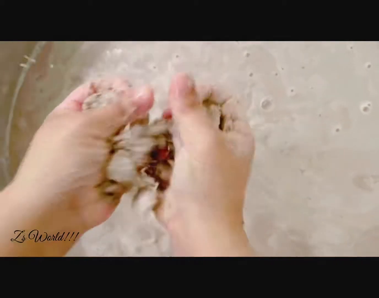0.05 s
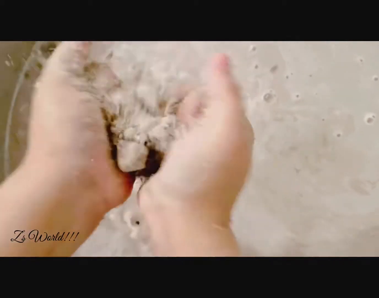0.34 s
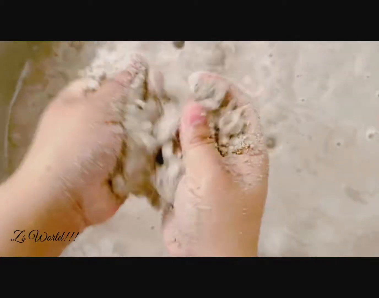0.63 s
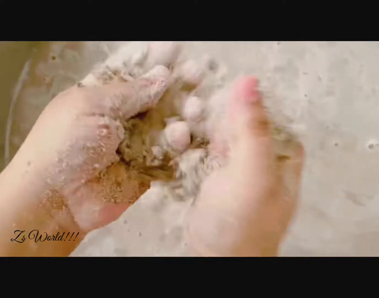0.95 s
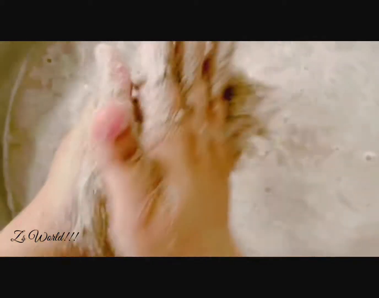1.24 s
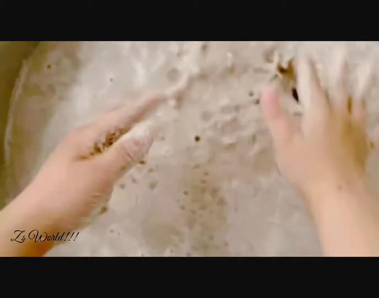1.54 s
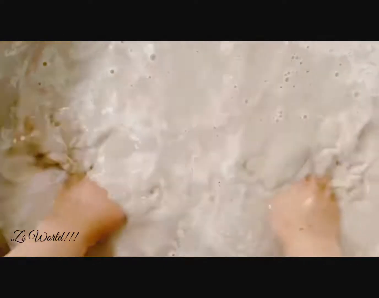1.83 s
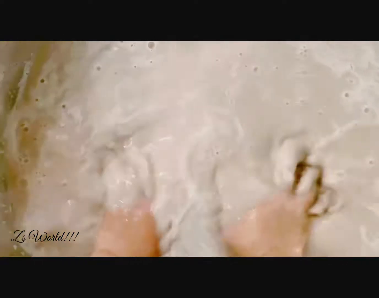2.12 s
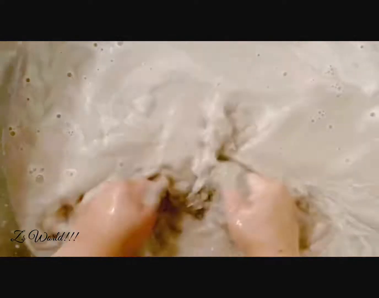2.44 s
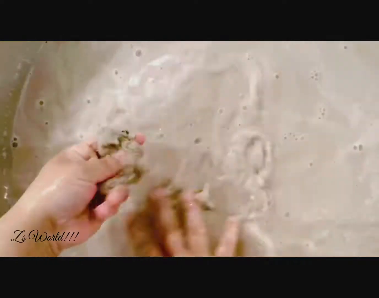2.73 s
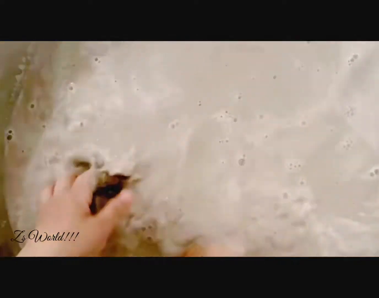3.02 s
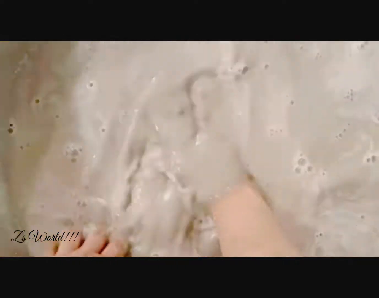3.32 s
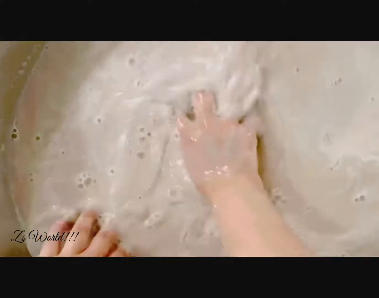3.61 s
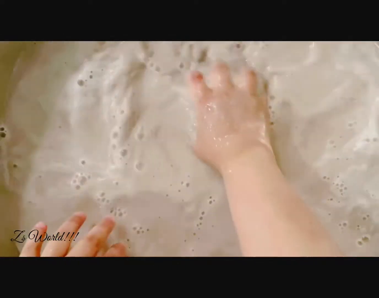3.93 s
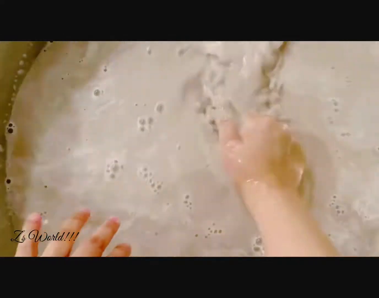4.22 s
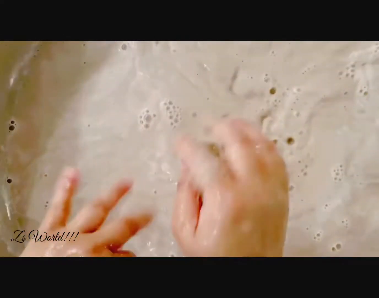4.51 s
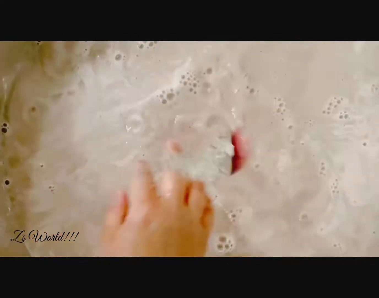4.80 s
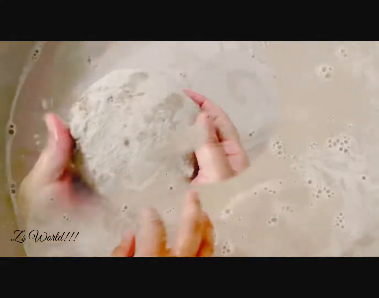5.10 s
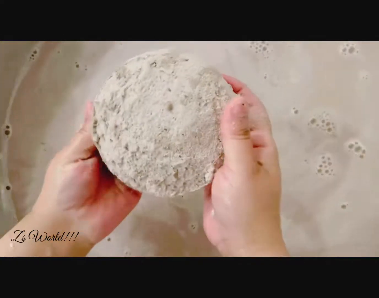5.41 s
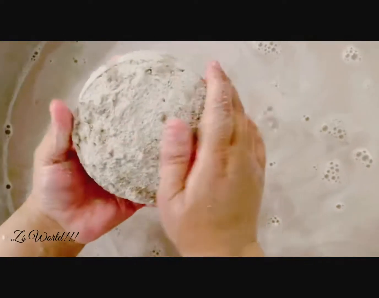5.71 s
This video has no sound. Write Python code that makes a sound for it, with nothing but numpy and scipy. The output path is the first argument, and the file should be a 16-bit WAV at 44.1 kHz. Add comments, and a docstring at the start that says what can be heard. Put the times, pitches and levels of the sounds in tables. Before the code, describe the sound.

Crisp, wet crunching of sand squeezed by hand gives way to soft sloshing and bubble plops, then a dry, grainy rasp.

```python
"""Wet sand and slurry in a basin.

Two hands crumble a lump of wet sand and cement, grope through the slurry, then rub a new ball.
With each stroke grains crackle, wet films snap, trapped air rings as bubbles and water sloshes.
A small room with a low hum answers; a close pair of microphone ports listens."""
import sys
import numpy as np
from scipy import signal
from scipy.fft import rfft, irfft, next_fast_len
from scipy.io import wavfile
from scipy.ndimage import uniform_filter1d

SR = 44100
rng = np.random.default_rng(int(sys.argv[2]) if len(sys.argv) > 2 else 0)


def unload_wav(signal):
    """Save mono or channel-first audio to the path in sys.argv[1] as 16-bit WAV at rate SR, clipped to [-1, 1]."""
    wavfile.write(
        sys.argv[1],
        SR,
        np.round(np.clip(np.atleast_2d(signal).T, -1, 1) * 32767).astype(np.int16),
    )


N = 253575
TIME_S = np.arange(N) / SR
EDGE_HZ, CRUMB_SPREAD_DB = 11600, 2

# Hand strokes in lump and slurry: start_s, length_s, sand_db, paste_db
STROKES = [(-0.03, 0.22, -43.5, -48.5), (0.269, 0.059, -40, -40), (0.418, 0.15, -45, -52),
           (0.611, 0.061, -40.5, -44.5), (0.685, 0.22, -42, -46), (0.967, 0.2, -38.5, -48.5),
           (1.206, 0.14, -40, -49), (1.374, 0.074, -38, -38), (1.508, 0.041, -40, -57),
           (1.608, 0.058, -41, -48.5), (2.224, 0.054, -57, -49), (2.373, 0.068, -46, -57),
           (2.507, 0.13, -44, -59.5), (2.752, 0.044, -39, -65), (2.945, 0.028, -39, -39),
           (3.185, 0.029, -60, -47.5), (3.574, 0.31, -55, -53.5), (3.977, 0.28, -72, -54),
           (4.23, 0.095, -52, -69), (4.44, 0.066, -56.5, -68)]
# Loudest breaking films and crumbs: time_s, level_db, centre_hz, decay_s
SNAPS = [(.0645, -10.5, 6100, 0.00034), (.0834, -34, 6200, .001), (.138, -16.5, 6600, 0.0016),
         (.1675, -14.5, 5800, 0.0058), (.2305, -10.5, 7200, 0.0012), (.326, -25, 5300, 0.0016),
         (.4, -19, 5570, 0.0017), (.4158, -23, 7000, 0.00089), (.443, -25.5, 5960, 0.0013),
         (.495, -15.5, 7350, 0.0027), (.515, -31, 5800, .0006), (.541, -25, 5200, 0.0011),
         (.569, -30, 6500, .0006), (.5857, -19, 7500, 0.00045), (.594, -34, 6500, 0.00066),
         (.608, -22, 6960, 0.00086), (.624, -8, 8500, 0.0013), (.6543, -35, 7200, .0007),
         (.6585, -13.5, 5970, 0.0044), (.7265, -36, 6500, .001), (.7555, -20, 4260, .0006),
         (.76, -23, 5440, 0.00097), (.8437, -26, 3200, 0.00048), (.8546, -17, 5400, 0.0033),
         (.8965, -25, 5470, 0.0011), (.9255, -34, 6030, .0008), (.9397, -12, 7400, 0.0024),
         (.9925, -27, 5900, .0007), (1.0155, -12.5, 7040, 0.0028), (1.048, -24, 6000, .0008),
         (1.1006, -18, 5800, 0.00044), (1.1215, -35, 6000, .0006), (1.1337, -11.5, 5300, 0.003),
         (1.1737, -26, 3800, .0007), (1.2617, -26, 3400, 0.0006), (1.2935, -31, 6000, .0008),
         (1.345, -32, 3600, .001), (1.374, -26, 4960, .0008), (1.3877, -21, 4470, 0.00042),
         (1.4052, -18, 3400, 0.0017), (1.412, -24, 3200, 0.0023), (1.4208, -14, 2880, .001),
         (1.4302, -12, 4140, 0.0048), (1.4397, -16, 5000, .00075), (1.4745, -6.5, 7260, 0.0013),
         (1.4825, -24, 5300, .0015), (1.5243, -11, 6150, .0012), (1.545, -28, 7500, .001),
         (1.5645, -31, 5500, .0007), (1.6296, -17, 6700, 0.00047), (1.6355, -25.5, 7100, 0.0018),
         (1.678, -26.5, 6000, .0007), (1.6905, -23, 3800, .001), (1.6958, -13.5, 6600, 0.0031),
         (1.909, -34, 9000, 0.0026), (2.2424, -19, 5700, 0.0014), (2.2578, -28, 6000, .0005),
         (2.304, -25.5, 4550, .001), (2.352, -26, 7700, 0.0016), (2.401, -31, 7020, .001),
         (2.4118, -30, 6360, 0.0008), (2.4575, -22.5, 7400, .0006), (2.494, -25, 4400, .0009),
         (2.5457, -31, 6030, .001), (2.561, -27, 7620, 0.00083), (2.5722, -15.5, 5100, 0.0026),
         (2.577, -4, 3100, 0.0021), (2.594, -16.5, 4600, 0.0025), (2.6342, -19, 7750, 0.00083),
         (2.6484, -10, 6900, .0005), (2.652, -13.5, 6800, 0.00071), (2.751, -28.5, 6000, 0.00064),
         (2.791, -24.5, 5500, 0.00051), (2.8, -29, 7500, .001), (2.8225, -32, 6000, .0008),
         (2.891, -26, 6100, .0013), (2.9213, -9, 8100, 0.0023), (2.9335, -18, 2880, 0.00076),
         (2.9562, -13, 4220, 0.0015), (2.9755, -16.5, 7500, .001), (2.989, -18.5, 4100, 0.0022),
         (3.048, -22, 8160, .0011), (3.101, -26, 8000, 0.001), (3.225, -24, 5440, 0.00059),
         (3.605, -38, 2500, .003), (3.6107, -28, 4500, 0.001), (3.62, -31, 3640, 0.0034),
         (3.671, -24.5, 5000, 0.001), (3.68, -22, 4700, 0.0006), (3.7235, -25.5, 4840, .0011),
         (3.7588, -36, 6500, .00077), (3.7785, -12.5, 5650, 0.00066), (3.7815, -10, 5700, .0036),
         (3.7865, -6, 4800, 0.00029), (3.801, -29, 4800, .0015), (4.039, -37, 6060, 0.00037),
         (4.2888, -25, 4900, 0.00088), (4.4325, -25.5, 8000, .001), (4.4358, -11.5, 8200, 0.00018),
         (4.454, -21, 4560, 0.0014), (4.4695, -28, 6500, 0.00057), (4.5216, -13.5, 5600, 0.0019),
         (4.5266, -9, 5800, 0.00041), (4.6188, -35, 2840, 0.0032), (4.716, -33, 6800, .001),
         (5.584, -25, 6400, .002), (5.6644, -34, 6500, 0.00081)]
# Loudest air pockets: time_s, level_db, pitch_hz, t60_s, glide_per_s, film_relative_db
BUBBLES = [(0.109, -29.5, 1480, 0.041, 16, -12), (.139, -28.5, 960, .012, -5, -9),
           (.165, -34.5, 850, 0.069, 3, 16), (.204, -32, 2300, 0.016, -4, -10),
           (.266, -29.5, 2270, 0.028, 9, -8), (.288, -25.5, 3470, .03, -7, -16),
           (.290, -24, 2740, 0.04, 20, -20), (.325, -19.5, 3120, 0.051, -6, -4),
           (0.356, -26.5, 910, 0.012, 39, 9.5), (0.356, -30, 1650, 0.031, -7, -2),
           (.497, -25, 2400, 0.019, -15, -13), (.534, -25.5, 2350, 0.019, 21, 5.5),
           (.544, -27, 2270, 0.018, -8, 2), (.551, -28, 2200, 0.02, -20, -16),
           (.612, -27.5, 3260, 0.034, -14, -7), (0.679, -21.5, 2240, 0.011, 11, -11),
           (0.696, -30.5, 2060, 0.034, 2, -13), (.731, -30, 1930, 0.027, -15, -8),
           (.799, -28, 2530, 0.031, -10, -14), (.824, -24, 1590, 0.023, 2, -4),
           (.8547, -27.5, 730, 0.011, 1, 2.5), (0.884, -27.5, 1780, 0.025, 0, 2),
           (0.8959, -21, 1010, 0.016, 11, -4), (.924, -31, 1016, 0.027, -2, -16),
           (.9395, -27, 970, 0.0062, -3, -2), (1.013, -32, 1094, 0.045, -13.5, 9.5),
           (1.031, -24.5, 1860, 0.05, 22, -14), (1.04, -22.5, 2460, 0.014, 20, -3),
           (1.057, -32, 1660, 0.02, -1, -4), (1.081, -19, 1450, 0.0076, 17, -24),
           (1.1006, -17, 1072, 0.039, -7.5, -4), (1.121, -21.5, 1036, 0.029, -5, 2.5),
           (1.1425, -24.5, 1620, 0.024, 8, 0.5), (1.159, -27, 2400, .018, 2, -8),
           (1.196, -28, 1090, 0.025, -12, -18), (1.2345, -17, 2590, 0.021, -16.5, -10),
           (1.271, -28, 2380, .014, -4, -7), (1.277, -28, 1870, 0.023, 5, -7),
           (1.288, -28, 2300, 0.013, 6, -10), (1.361, -27, 2480, .028, -3, -6),
           (1.3673, -25.5, 1670, 0.011, -4, -4), (1.4045, -14, 2390, 0.01, 15, -22),
           (1.410, -19, 2310, .022, 10, -18), (1.411, -26.5, 1123, 0.042, -4, 1),
           (1.419, -25, 1420, 0.0093, -15, -1), (1.430, -25, 1960, 0.044, 6, -17),
           (1.445, -21.5, 2330, 0.025, -6.5, -8), (1.513, -27, 2770, 0.057, -10.5, -10),
           (1.526, -14.5, 1480, 0.0039, -5, -28), (1.551, -19.5, 5170, .018, -4, -14),
           (1.579, -26, 1075, 0.027, -20, -7.5), (1.5845, -23, 6130, .011, 2, -14),
           (1.626, -27.5, 1870, 0.05, 17, -14), (1.637, -22, 2070, 0.031, -12, -18),
           (1.656, -33, 2380, .012, 0, -6), (1.663, -21.5, 1900, 0.014, -2, -15),
           (1.678, -21.5, 1400, 0.01, 25, -16), (1.6891, -21.5, 1860, 0.018, -6, -6),
           (1.784, -23.5, 1430, 0.0077, -12, -21), (1.802, -34, 1340, 0.023, -16, 1),
           (1.862, -47.5, 613, 0.097, -5.5, -18), (2.1702, -30, 2680, 0.02, -2, -4),
           (2.2576, -21, 1330, 0.034, 13, -2.5), (2.311, -22.5, 1380, 0.031, 8, -11),
           (2.3115, -39, 3030, .025, 0, -9), (2.312, -25, 2260, 0.031, 1, -7),
           (2.339, -38, 653, 0.13, 2, -12), (2.413, -25, 1800, 0.029, 14, -16),
           (2.414, -24, 1360, 0.02, -8, -31), (2.4219, -29.5, 1040, 0.12, 10, -12),
           (2.427, -24, 1690, 0.021, -8, -15), (2.484, -19.5, 1430, 0.038, -4.5, -6),
           (2.507, -31, 2350, 0.064, 0, -1), (2.5764, -6.5, 2360, 0.011, -14, -17),
           (2.5785, -18, 3450, 0.016, 4, -25), (2.5785, -22.5, 700, 0.034, -1, 6),
           (2.6492, -15, 1510, 0.0096, -16, -15), (2.6509, -29, 733, 0.044, 2.5, 0),
           (2.665, -30, 2700, 0.025, -11, -5), (2.837, -30, 1410, 0.015, 13, -9),
           (2.903, -32, 2900, 0.027, 1, 0), (2.9556, -14.5, 2970, 0.02, 10, -15),
           (2.9565, -12.5, 2270, 0.009, 0, -18), (2.9565, -15, 5560, 0.016, -12, -12),
           (2.978, -20, 2650, 0.012, -7, -15), (2.981, -18, 1800, 0.01, 3, -11),
           (2.989, -26, 3200, .014, 0, 4), (3.0025, -37, 5450, 0.018, -2, -9),
           (3.011, -31.5, 1760, 0.022, -16, -15), (3.052, -20.5, 2480, 0.018, 9, -15),
           (3.055, -30, 1430, 0.044, 35, -13), (3.224, -26, 5600, 0.014, 0, -20),
           (3.266, -34, 1940, 0.032, -1, -21), (3.589, -39.5, 1110, 0.021, -14, 3),
           (3.6098, -22, 1187, 0.018, -18, -7.5), (3.6185, -31, 1480, .02, 10, -13),
           (3.656, -30.5, 1860, .018, 2, -14), (3.697, -26.5, 1800, 0.023, 33, -13),
           (3.742, -22, 1940, 0.015, -6, -20), (3.751, -23, 1420, 0.022, -15, -1),
           (3.758, -20, 6530, 0.011, 12, -20), (3.765, -26, 5500, 0.012, -10, -14),
           (3.785, -22, 710, 0.018, -42, 8.5), (3.972, -29.5, 2170, 0.014, -5, -6),
           (4.038, -22, 6530, 0.0099, 0, -11), (4.164, -29.5, 1600, 0.0047, -1, -12),
           (4.233, -37, 2120, 0.019, 10, 4), (4.262, -30.5, 2860, 0.019, 9, -13),
           (4.364, -32.5, 1530, 0.015, 3, -20), (4.365, -30, 1064, 0.024, -9, -15),
           (4.3752, -30, 1100, 0.029, 38, -14), (4.3811, -26, 2510, 0.016, -14, -13),
           (4.454, -28.5, 1030, 0.033, 13, -23), (4.5275, -27, 750, 0.0038, -30, -28),
           (4.6183, -34.5, 1720, 0.027, -4, 6), (4.7155, -39, 1755, 0.022, -3, -12)]
# Big cavities in the slurry: time_s, level_db, pitch_hz, t60_s, glide_per_s, swell_cycles
GULPS = [(.164, -26, 258, 0.012, -13, 0.73), (2.9215, -10, 887, .011, -9, 1.7),
         (2.9365, -25.5, 925, 0.036, -7.5, 1.3), (2.9575, -10.5, 587, 0.015, -5, 1.5),
         (2.963, -20, 530, 0.041, -0.5, 1.8), (3.839, -16, 498, 0.12, 13, 1.24),
         (3.8429, -19, 647, 0.043, 40.5, 1)]
# Air pushed under the slurry: start_s, length_s, level_db
GURGLES = [(1.915, .2, -48.5), (2.19, 0.12, -47), (3.04, 0.16, -52)]
# Palm rubs on the ball: start_s, length_s, level_db
RUBS = [(4.66, 0.33, -55.5), (4.96, 0.31, -50), (5.17, 0.27, -45.5), (5.5, .11, -38), (5.66, .12, -42)]
# Whistles of sliding hands: start_s, length_s, level_db, centre_hz, sigma_hz
WHISTLES = [(1.86, 0.26, -52.5, 3100, 190), (3.03, 0.29, -55.5, 3100, 200), (4.96, .13, -55.5, 2790, 89.3),
            (5.165, 0.05, -50.5, 2740, 110)]
# Water moved by sunken hands: time_s, level_db
WATER_LEVEL = [(0.0, -57), (0.35, -49.5), (0.54, -56), (1.2, -60), (1.42, -53.5), (1.86, -62.5),
               (2.16, -57), (2.47, -60.5), (2.8, -56.5), (3.09, -51.5), (3.41, -54), (4.02, -53),
               (4.15, -55.5), (4.8, -68.5), (5.17, -68.5), (5.75, -57)]
# Ripples round the arms: time_s, level_db
RIPPLE_LEVEL = [(0, -43), (1.7, -51.5), (1.9, -46.5), (2.15, -46), (2.35, -48), (2.85, -49), (3.15, -46.5),
                (3.35, -52.5), (4.1, -53), (4.7, -66), (5.75, -53)]
# Grinding sand: freq_hz, gain_db
GRIT_SPECTRUM = [(300, -17.5), (1200, -31), (2500, -7.5), (4000, -1.5), (5500, 0.5), (7500, 3), (9500, 0.5),
                 (10500, 3)]
# Wet paste: freq_hz, gain_db
PASTE_SPECTRUM = [(200, -30.5), (500, -6), (900, 7), (1300, -5.5), (2200, 0.5), (3100, 2), (4000, -9),
                  (6000, 2), (10000, -38)]
# Rubbed dry sand: freq_hz, gain_db
SCRAPE_SPECTRUM = [(200, -27), (600, -8.5), (1200, -17.5), (2000, -10), (4000, -4.5), (6000, 2.5),
                   (8000, 5.5), (9600, 1), (10500, -5.5)]
# Ripples: freq_hz, gain_db
RIPPLE_SPECTRUM = [(200, -19.5), (450, -10.5), (800, -5.5), (1200, -3.5), (1550, -3), (1900, -3.5),
                   (2300, 0), (2800, -1), (3450, -6), (4200, -3.5), (10000, -13.5)]
# Churning water: freq_hz, gain_db
SURGE_SPECTRUM = [(100, 4), (180, 4), (280, -0.5), (400, -4), (550, -2.5), (1500, -18)]
# Hollows of basin and cupped hands: centre_hz, width_hz, gain_db
BASIN_MODES = [(1340, 73, -12), (1710, 290, 15), (2220, 120, 14.5), (2790, 61, 7.5), (3400, 49, 3)]
# Hollow between palms and ball: centre_hz, width_hz, gain_db
PALM_MODES = [(1740, 200, 5.5), (2296, 79, 14.5), (2820, 80, 10.5), (3510, 89, 11), (4600, 310, 1.5),
              (6110, 83, 1), (6700, 78, -3.5)]
# Room hum: freq_hz, rms_db
HUM_LINES = [(58.5, -50.5), (121, -61), (181, -86.5), (241, -70)]
# Room rumble: freq_hz, gain_db
RUMBLE_SPECTRUM = [(15, -18), (30, -12), (45, -6.5), (58, 3.5), (80, -6), (110, -8), (150, -8.5),
                   (220, -22.5), (400, -52), (1000, -50)]
# Near walls: delay_s, gain_db
ECHOES = [(.0034, -40), (.0092, -35), (0.017, -23.5)]
# Room decay: freq_hz, t60_s
ROOM_T60 = [(200, .5), (420, .55), (570, .88), (780, .58), (1200, .5), (3000, .38), (6000, .27),
            (10000, .22)]
# Room tail strength: freq_hz, gain_db
ROOM_GAIN = [(150, -14.5), (550, -11), (800, -9), (1300, -14), (3000, -17), (6000, -18), (10000, -23.5)]
# Diffuse sound between the ports: freq_hz, coherence
PORT_COHERENCE = [(100, 1), (280, 0.21), (600, 0.098), (1000, 0.041), (1700, 0.99), (3200, 1), (6000, 0.39),
                  (10000, 0.15)]
# Phase between the ports: freq_hz, left_lead_rad
PORT_PHASE = [(20, 0), (1900, 0), (2700, .75), (3900, .7), (4400, 1.4), (4850, 3.1), (5200, 4.8),
              (5650, 6.15), (6300, 6.5), (6900, 7.4), (8700, 9.25), (9400, 9.3), (10200, 9.9)]
# Treble lift near 10 kHz, then a steep drop: freq_hz, gain_db
TOP_TREBLE = [(8500, -1), (10050, 4.5), (10700, -26), (11600, -30)]


def grit(per_s=2200, bands=14, width_ratio=.13, clump_db=4.5, clump_hz=90, chip_db=-10, level_db=1.5):
    """Sand slips in clumps under the fingers; each crumb ticks in a band set by its size."""
    grains = np.zeros(N)
    for centre_hz in np.geomspace(2600, 9200, bands):
        ticks = clicks(per_s / bands, CRUMB_SPREAD_DB)
        grains += filtered(ticks, lambda hz: bell(hz, centre_hz, width_ratio * centre_hz))
    grains += amp(chip_db) * clicks(per_s / bands, CRUMB_SPREAD_DB)  # broadband hard chips
    grains *= amp(clump_db * drift(clump_hz))
    grains = hollow(grains, BASIN_MODES, depth_db=-11)
    return steadied(coloured(grains, GRIT_SPECTRUM)) * grinding() * amp(level_db)


def paste(per_s=2200, clump_db=8, clump_hz=60, level_db=-4):
    """Stirred wet paste smacks and fizzes."""
    grains = clicks(per_s, CRUMB_SPREAD_DB) * amp(clump_db * drift(clump_hz))
    grains = hollow(grains, BASIN_MODES, depth_db=-6)
    return steadied(coloured(grains, PASTE_SPECTRUM)) * stirring() * amp(level_db)


def snaps(rise_s=.0003, fray_s=.00054, spray_s=.0035, spray_db=-16, ragged_db=5, level_db=-.5):
    """A film frays, tears in a short burst and leaves a ragged spray."""
    out = np.zeros(N)
    t = np.arange(-500, 900) / SR
    before, after = np.minimum(t, 0), np.maximum(t, 0)
    for time_s, db, centre_hz, decay_s in list(SNAPS) + pocket_films() + crumbs():
        noise, tatter = rng.standard_normal((2, len(t)))
        ragged = unit_rms(amp(ragged_db * unit_rms(uniform_filter1d(tatter, size=40))))
        tear = np.exp(before / rise_s - after / decay_s)
        spray = amp(spray_db) * ragged * np.exp(before / fray_s - after / spray_s)
        burst = filtered(np.sign(noise) * np.hypot(tear, spray), lambda hz: snap_band(hz, centre_hz))
        energy_ms = np.sum(burst ** 2) / (SR / 1000)
        add(out, time_s + t[0], amp(db + level_db) * burst / np.sqrt(energy_ms))
    return out


def snap_band(hz, centre_hz, width_ratio=.47, skirt_db=-20, low_hz=700, bright_db=7):
    """Snap response: so small a source radiates little bass, much treble."""
    bass_cut = hz ** 2 / (hz ** 2 + low_hz ** 2)
    treble = amp(np.interp(hz, [6000, 9500], [0, bright_db])) * (hz < EDGE_HZ)
    return bass_cut * treble * (bell(hz, centre_hz, width_ratio * centre_hz) + amp(skirt_db))


def pocket_films(offset_db=-2, decay_s=.0002):
    """SNAPS rows: a film tears as each pocket opens, an octave above its ring."""
    return [(time_s, db + film_db + offset_db, 2 * hz, decay_s)
            for time_s, db, hz, _, _, film_db in BUBBLES]


def crumbs(per_s=16, over_db=5, spread_db=4, centre_hz=5500, spread_octaves=.93, decay_s=.0005):
    """SNAPS rows: lesser crumbs break at random, as hard as the sand is ground."""
    force_db, rows = 20 * np.log10(grinding()), []
    for when, size, pitch in rng.random((int(per_s * N / SR), 3)):
        db = force_db[int(when * N)] + over_db + spread_db * min(-np.log(1 - size), 2)
        hz = centre_hz * 2 ** (spread_octaves * (2 * pitch - 1))
        rows.append((when * N / SR, db, hz, decay_s))
    return rows


def bubbles():
    """Single air pockets plip, each with its own decay and chirp."""
    out = np.zeros(N)
    for time_s, db, hz, t60_s, glide_per_s, _ in BUBBLES:
        plip = pocket(hz, t60_s, glide_per_s, swell_cycles=1, wobble=.061, rough=.27)
        add(out, time_s, amp(db) * plip)
    return out


def gulps(level_db=2):
    """Big cavities close with a deep, nearly clean gulp."""
    out = np.zeros(N)
    for time_s, db, hz, t60_s, glide_per_s, swell_cycles in GULPS:
        gulp = pocket(hz, t60_s, glide_per_s, swell_cycles, wobble=.022, rough=.2)
        add(out, time_s, amp(db + level_db) * gulp)
    return out


def pocket(hz, t60_s, glide_per_s, swell_cycles, wobble, rough, wobble_cycles=1.13):
    """Air pocket in thick slurry: unsteady pitch and strength."""
    noise = rng.standard_normal((2, 9000))
    slow = filtered(noise, lambda f: np.exp(-np.minimum(f * wobble_cycles / hz, 10) ** 2))
    bend, squeeze = unit_rms(slow)
    pip = ring(hz, t60_s, glide_per_s, wobble * bend, swell_cycles)
    pip *= 1 + rough * squeeze[:len(pip)]
    # little radiation below its own pitch
    return filtered(pip, lambda f: 1 - np.exp(-np.minimum(2 * f / hz, 10) ** 4))


def ring(hz, t60_s, glide_per_s, bend=np.zeros(9000), swell_cycles=.33):
    """Trapped air swells and rings down; its pitch slides as it nears the surface."""
    t = np.arange(0, np.clip(t60_s * 1.2, .005, .2), 1 / SR)
    pitch_hz = hz * np.maximum(1 + glide_per_s * t, .5) * (1 + bend[:len(t)])
    envelope = (1 - np.exp(-(t * hz / swell_cycles) ** 2)) * np.exp(-np.log(1000) * t / t60_s)
    return envelope / envelope.max() * np.sin(2 * np.pi * np.cumsum(pitch_hz) / SR)


def froth(level_db=-2):
    """Tiny bubbles burst in the stirred slurry."""
    stream = bubbling(per_s=220, low_hz=1137, high_hz=4190, t60_cycles=76, glide_per_s=23, spread_db=0)
    return stream * stirring() * amp(level_db)


def gurgle():
    """Large, slow pockets roll out from under the sunken hands."""
    stream = bubbling(per_s=160, low_hz=133, high_hz=412, t60_cycles=24, glide_per_s=1.8, spread_db=2)
    return stream * pressure(GURGLES)


def bubbling(per_s, low_hz, high_hz, t60_cycles, glide_per_s, spread_db):
    """Steady stream of mixed bubbles, rms 1."""
    out = np.zeros(N)
    for when, pitch, size, slide in rng.random((int(per_s * N / SR), 4)):
        hz = low_hz * (high_hz / low_hz) ** pitch
        db = spread_db * min(-np.log(1 - size), 3)
        add(out, when * N / SR, amp(db) * ring(hz, t60_cycles / hz, glide_per_s * (2 * slide - 1)))
    return unit_rms(out)


def scrape(catch_db=1.6, catch_hz=60, lurch_db=1.5, lurch_hz=14, level_db=1):
    """Dry sand rasps under unevenly sliding palms and rings the hollow between them."""
    grains = clicks(per_s=5000, spread_db=1.5)
    grains *= amp(catch_db * drift(catch_hz) + lurch_db * drift(lurch_hz))
    return coloured(hollow(grains, PALM_MODES), SCRAPE_SPECTRUM) * pressure(RUBS) * amp(level_db)


def whistles(flutter_db=2, flutter_hz=40):
    """Thin, fluttering whistles in the hiss of sliding hands."""
    out = np.zeros(N)
    for start_s, length_s, db, centre_hz, sigma_hz in WHISTLES:
        band = filtered(rng.standard_normal(N), lambda hz: bell(hz, centre_hz, sigma_hz))
        band *= amp(flutter_db * drift(flutter_hz))
        out += unit_rms(band) * pressure([(start_s, length_s, db)])
    return out


def ripples(lap_db=3, lap_hz=25):
    """Ripples lap at the arms and the basin wall."""
    laps = clicks(per_s=5000, spread_db=2.5) * amp(lap_db * drift(lap_hz))
    return coloured(laps, RIPPLE_SPECTRUM) * amp(curve(RIPPLE_LEVEL))


def surge(swell_db=4, swell_hz=25, level_db=1):
    """Water churns dully round the sunken hands."""
    churn = coloured(rng.standard_normal(N), SURGE_SPECTRUM)
    return churn * amp(curve(WATER_LEVEL) + level_db + swell_db * drift(swell_hz))


def room(x, build_s=.00057):
    """Diffuse tail, partly coherent between the ports."""
    hz, t, (left, other) = signal.stft(rng.standard_normal((2, SR)), SR, nperseg=256)
    coherence = np.clip(lookup(PORT_COHERENCE, hz), -1, 1)[:, None]
    right = coherence * left + np.sqrt(1 - coherence ** 2) * other
    t60_s = np.clip(lookup(ROOM_T60, hz), .1, 1)[:, None]
    fade = np.exp(-np.log(1000) * t / t60_s) * (1 - np.exp(-t / build_s))
    fade *= amp(lookup(ROOM_GAIN, hz))[:, None] / np.sqrt(SR * np.mean(fade ** 2, axis=1, keepdims=True))
    tail = signal.istft(np.array([left, right]) * fade, SR, nperseg=256)[1]
    return signal.fftconvolve(x[None], tail, axes=1)[:, :N]


def hum(rumble_db=-51.2, waver_rad=.6, waver_hz=3):
    """Wavering low lines over room rumble."""
    lines = sum(amp(db) * np.sqrt(2) * np.sin(2 * np.pi * hz * TIME_S + waver_rad * drift(waver_hz))
                for hz, db in HUM_LINES)
    return lines + amp(rumble_db) * coloured(rng.standard_normal(N), RUMBLE_SPECTRUM)


def grinding():
    """Stroke gain on the sand."""
    return pressure([(start_s, length_s, db) for start_s, length_s, db, _ in STROKES], rest_db=-65)


def stirring(current_db=-5):
    """Stroke gain on the paste; moving water sustains it between strokes."""
    moves = [(start_s, length_s, db) for start_s, length_s, _, db in STROKES]
    return pressure(moves, rest_db=curve(WATER_LEVEL) + current_db)


def pressure(moves, rest_db=-100, grip_s=.022, release_db_per_s=141):
    """Gain of movements that take hold, press evenly and let go."""
    power = amp(rest_db) ** 2
    for start_s, length_s, db in moves:
        since_s = TIME_S - start_s
        grip = np.clip(since_s / grip_s, 0, 1)
        release_db = release_db_per_s * np.maximum(since_s - length_s, 0)
        power = power + (grip * amp(db - release_db)) ** 2
    return np.sqrt(power)


def hollow(x, modes, depth_db=0):
    """A cavity stresses a few bands."""
    return x + sum(amp(db + depth_db) * signal.lfilter(*signal.iirpeak(hz, hz / width_hz, SR), x)
                   for hz, width_hz, db in modes)


def clicks(per_s, spread_db):
    """Random clicks of either sign; most small, a few large."""
    when, size, sign = rng.random((int(per_s * N / SR) + 1, 3)).T
    db = spread_db * np.minimum(-np.log(1 - size), 5)
    out = np.zeros(N)
    out[(when * N).astype(int)] = np.sign(sign - .5) * amp(db)
    return out


def steadied(x):
    """Holds the typical level at 1; big grains still stand out."""
    power = np.maximum(uniform_filter1d(x ** 2, size=220), 1e-9)
    return x / np.exp(uniform_filter1d(np.log(power), size=4400) / 2)


def drift(rate_hz, hop=32):
    """Slow noise, rms 1."""
    noise = rng.standard_normal(len(TIME_S[::hop]))
    slow = filtered(noise, lambda hz: np.exp(-(hz / hop / rate_hz) ** 2))
    return np.interp(TIME_S, TIME_S[::hop], unit_rms(slow))


def coloured(x, spectrum):
    """Applies a spectrum table; rms 1."""
    return unit_rms(filtered(x, lambda hz: amp(lookup(spectrum, hz))))


def filtered(x, response):
    """Applies a response given as a function of Hz."""
    size = next_fast_len(x.shape[-1] + 600, True)
    return irfft(rfft(x, size) * response(np.fft.rfftfreq(size, 1 / SR)), size)[..., :x.shape[-1]]


def bell(hz, centre_hz, sigma_hz):
    """Gaussian band."""
    return np.exp(-.5 * ((hz - centre_hz) / sigma_hz) ** 2)


def lookup(table, hz):
    """Interpolates on a log-frequency axis."""
    freq_hz, value = np.transpose(table)
    return np.interp(np.log(hz + 1), np.log(freq_hz + 1), value)


def curve(table):
    """Interpolates a time table at every sample."""
    return np.interp(TIME_S, *np.transpose(table))


def add(mix, time_s, sound):
    """Mixes a sound in place."""
    part = mix[max(round(time_s * SR), 0):][:len(sound)]
    part += sound[:len(part)]


def unit_rms(x):
    """Scales to rms 1."""
    return x / np.sqrt(np.mean(x ** 2) + 1e-20)


def amp(db):
    """Decibels to gain."""
    return 10 ** (np.asarray(db) / 20)


def scene(grain_side_db=-9, ripple_side_db=-9, surge_side_db=-17, crossfade_hz=1.3):
    """The basin in its room; grains and water scatter to either side."""
    basin = grit() + paste() + snaps() + bubbles() + gulps() + froth() + gurgle()
    basin += scrape() + whistles() + ripples() + surge()
    side = amp(grain_side_db) * (grit() + scrape())
    side += amp(ripple_side_db) * ripples() + amp(surge_side_db) * surge()
    echoes = sum(amp(db) * np.interp(TIME_S - delay_s, TIME_S, basin, left=0) for delay_s, db in ECHOES)
    # two room tails crossfade slowly so the decay does not ring on fixed pitches
    crossfade_rad = np.pi * crossfade_hz * TIME_S
    tail = room(basin * np.cos(crossfade_rad)) + room(basin * np.sin(crossfade_rad))
    return basin + side * np.array([[1], [-1]]) + echoes + tail + hum()


def record(dry, clip_level=.85):
    """Port phase, treble lift and drop, overload on the hardest snaps, then the band limit."""
    half_phase = .5j * np.array([[1], [-1]])
    ported = filtered(dry, lambda hz: amp(lookup(TOP_TREBLE, hz))
                      * np.exp(half_phase * lookup(PORT_PHASE, hz)))
    low_pass = signal.firwin(131, EDGE_HZ, window=("kaiser", 7), fs=SR)
    return signal.oaconvolve(np.clip(ported, -clip_level, clip_level), low_pass[None], "same", axes=1)


dry = scene()
out = record(dry)
unload_wav(out)
```